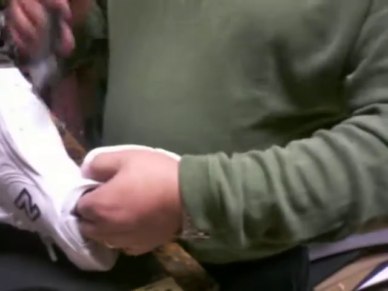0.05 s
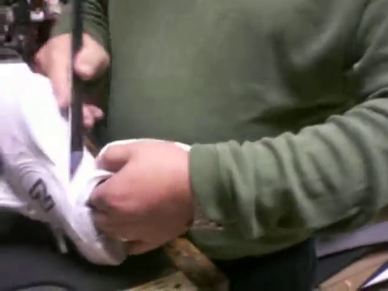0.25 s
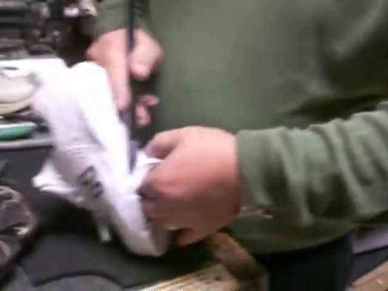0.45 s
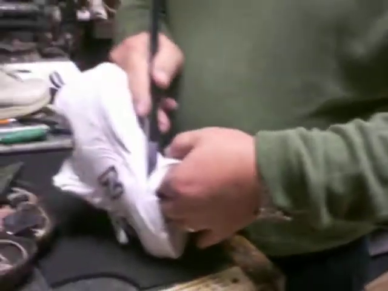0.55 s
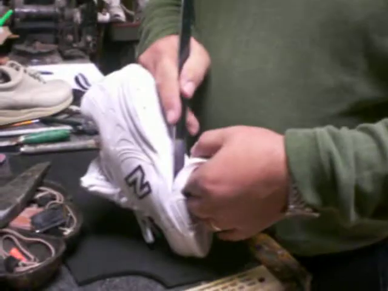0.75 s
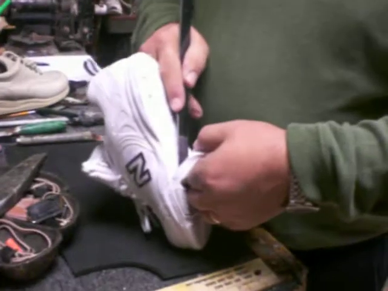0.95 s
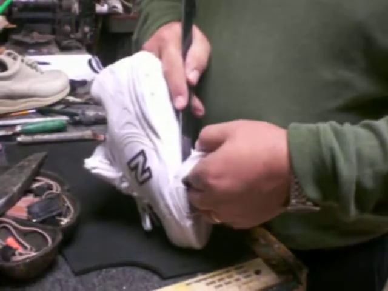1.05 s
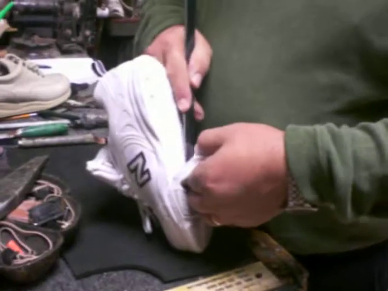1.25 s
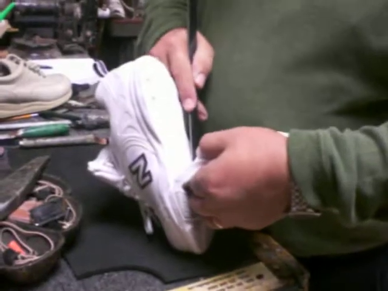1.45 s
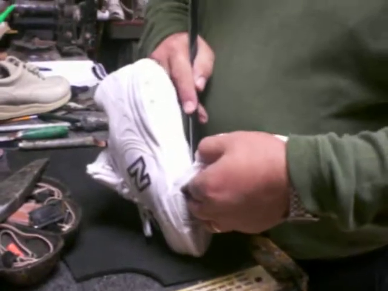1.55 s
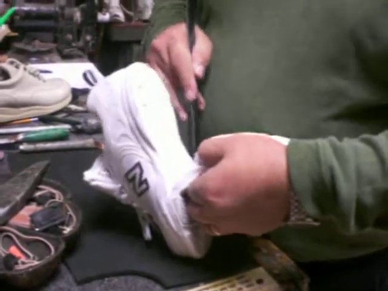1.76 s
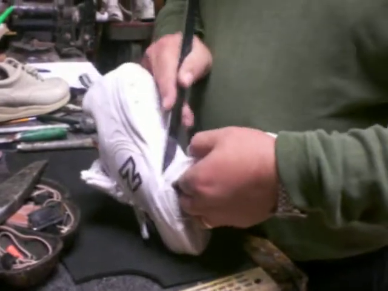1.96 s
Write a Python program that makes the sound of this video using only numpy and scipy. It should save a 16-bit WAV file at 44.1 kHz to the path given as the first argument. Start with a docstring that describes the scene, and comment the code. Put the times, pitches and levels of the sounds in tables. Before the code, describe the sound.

Soft blade scraping on a rubber sole, with a few small knocks over workshop hum.

```python
"""A thin blade works on the sole of a hand-held shoe, over a small workshop's steady noise and hum.
First the blade tip ticks and scrapes, and one hollow knock makes the shoe ring, with a faint rumble.
Then short, light strokes rasp as the blade catches on the rubber; the shoe takes a few soft bumps
and rustles in the hand. Near the end the blade bites in with a hiss, its tip ticks once more,
and its flat side taps the edge of the sole."""
import sys
import numpy as np
from scipy import signal
from scipy.fft import rfft, irfft
from scipy.io import wavfile

SR = 44100
rng = np.random.default_rng(int(sys.argv[2]) if len(sys.argv) > 2 else 0)


def wav_record(signal):
    """Record a signal, one row per channel, as 16-bit PCM in the file named by sys.argv[1]."""
    frames = np.transpose(np.atleast_2d(signal))
    bounded = np.clip(frames, -1, 1)
    # unit amplitude maps onto the largest positive 16-bit level
    quanta = np.round(bounded * 32767).astype(np.int16)
    wavfile.write(sys.argv[1], SR, quanta)


N = 88200
TIME = np.arange(N) / SR

# the tones the shoe rings with: (pitch [Hz], level [dB], time to fade by 60 dB [s])
SHOE_TONES = [(225, -15, 0.027), (376, -38, .05), (537, -15, 0.057), (561, -4, 0.042), (739, -14.5, 0.043),
              (996, -1, 0.0061), (1540, -13.5, 0.013), (2060, -16.5, 0.009), (2360, -17, 0.013),
              (3067, -9.5, .005), (4510, -11, 0.0025), (5130, -29, 0.015), (6700, -22.5, 0.0062),
              (8530, -13, 0.0024)]


def from_db(db):
    """Turn decibels into a factor to multiply a sound by."""
    return 10 ** (np.asarray(db) / 20)


def rms_one(x):
    """Scale a sound so that its average strength (rms) is 1."""
    return x / np.sqrt(np.mean(x ** 2) + 1e-20)


def at_hz(points, hz, column=1):
    """Read a table between its rows, with frequency spaced in octaves."""
    table = np.array(points)
    return np.interp(np.log(hz), np.log(table[:, 0]), table[:, column])


def coloured(x, spectrum, tilt_db=0):
    """Set a sound's balance of bass and treble, tilted by tilt_db per octave; strength 1."""
    hz = np.maximum(np.fft.rfftfreq(N, 1 / SR), 1)
    octaves = np.log2(np.maximum(hz, spectrum[0][0]))
    gain = from_db(at_hz(spectrum, hz) + tilt_db * octaves)
    return rms_one(irfft(rfft(x) * gain, N))


def soften(x, hz, order=1, kind="low"):
    """Keep what is below hz ("low") or above it ("high"); a higher order cuts more steeply."""
    sections = signal.butter(order, min(hz, SR / 2 - 1), kind, fs=SR, output="sos")
    return signal.sosfilt(sections, x + 1e-18)


def drift(hz):
    """A random wander of strength 1; a higher hz makes it quicker."""
    return rms_one(soften(rng.standard_normal(2 * N), hz, order=2)[N:])


def swell(peak_s, rise_s, fall_s, db):
    """A level that builds and falls away: 8.5 dB down one rise or fall time from its peak."""
    away = np.maximum((peak_s - TIME) / rise_s, (TIME - peak_s) / fall_s)
    return from_db(db - 8.5 * away ** 1.72)


def ring(force, tones):
    """A pushed object rings with its own tones, each fading at its own speed."""
    sound = np.zeros(N)
    for hz, db, fade_s in tones:
        decay = from_db(-60 / (fade_s * SR))
        angle = 2 * np.pi * hz / SR
        feedback = [1, -2 * decay * np.cos(angle), decay * decay]
        sound += from_db(db) * signal.lfilter([0, np.sin(angle)], feedback, force + 1e-18)
    return sound


def blows(hits, tones):
    """Each hit, a click and a crunch of grit with its own level and brightness, makes an object ring."""
    crunch_share, crunch_s = 0.062, 0.0018
    force = np.zeros(N)
    for start_s, db, brightness_hz in hits:
        click = signal.unit_impulse(N, int(start_s * SR))
        fading = signal.lfilter([1], [1, -np.exp(-1 / (crunch_s * SR))], click + 1e-18)
        crunch = soften(crunch_share * fading * rng.standard_normal(N), hz=1000, order=2, kind="high")
        force += from_db(db) * soften(click + crunch, brightness_hz)
    # a thing as small as a shoe gives off little bass
    return soften(ring(force, tones), hz=248.4, order=4, kind="high")


def grains():
    """Rubbing is countless tiny catches of uneven size, bunched by a quick judder."""
    catches_per_s, judder_db, judder_hz = 14000, 2, 116
    sizes = from_db(-0.5 * np.minimum(rng.exponential(1, N), 4))
    signs = rng.choice([-1, 1], N)
    caught = rng.random(N) < catches_per_s / SR
    return sizes * signs * caught * from_db(judder_db * drift(judder_hz))


def background():
    """Steady room noise and a faint, wavering hum."""
    # the hum's tones: (pitch [Hz], level [dB], waver [dB])
    hum_tones = [(60, -73.5, 4), (162.6, -69, 3.5)]
    # the colour of the room noise: (frequency [Hz], level [dB])
    air_colour = [(15, -39), (25, -3), (151, 0.5), (205, -4), (279, -1.5), (317, -6), (572, -5), (702, -10),
                  (1860, -14), (6210, -20), (7440, -20), (8030, -19.5), (9610, -21.5), (10400, -21.5),
                  (11500, -29.5), (15000, -49), (22000, -120)]
    hum = 0
    for hz, db, waver_db in hum_tones:
        waver = from_db(waver_db * np.tanh(drift(hz=1.9)))
        tone = np.sin(2 * np.pi * (hz * TIME + rng.random()))
        hum += from_db(db) * rms_one(waver * tone)
    return hum + from_db(-56.5) * coloured(rng.standard_normal(N), air_colour)


def rumble():
    """A low rumble swells faintly around the loud knock and just after it."""
    # the swells: (peak time [s], rise [s], fall [s], level [dB])
    swells = [(0.29, 0.11, 0.086, -61), (0.49, 0.046, .05, -60)]
    # the rumble's colour: (frequency [Hz], level [dB])
    colour = [(35, -28), (52, -10), (62, 8), (75, -3), (110, -14), (250, -66)]
    return sum(swell(*row) for row in swells) * coloured(rng.standard_normal(N), colour)


def room_echo(sound):
    """The workshop sends back a short wash of sound that dies away, with a few dull echoes in it."""
    # bounces off the bench and walls: (delay [s], level [dB])
    bounces = [(.0098, -18.5), (.0158, -21.5), (0.0267, -26.5), (.0305, -17)]
    # the wash: (frequency [Hz], level [dB], time to fade by 60 dB [s])
    wash = [(151, -24, 0.27), (279, -11, 0.31), (500, -13, 0.21), (1210, -9.5, 0.24), (3130, -9.5, 0.23),
            (6304, -8, 0.48), (11120, -9.5, 0.051)]
    t, tail = TIME[:SR // 2], 0
    onset = 1 - np.exp(-(t / 0.0027) ** 2)
    edges_hz = np.geomspace(100, 12800, 8)
    for low, high in zip(edges_hz, edges_hz[1:]):
        hz = np.sqrt(low * high)
        band_filter = signal.butter(2, [low, high], "band", fs=SR, output="sos")
        noise = signal.sosfilt(band_filter, rng.standard_normal(len(t)))
        fade = from_db(-60 * t / at_hz(wash, hz, column=2))
        band_share = np.sqrt(2 * (high - low) / SR / len(t))
        tail += rms_one(noise * fade * onset) * from_db(at_hz(wash, hz)) * band_share
    echoes = sum(from_db(db) * np.interp(TIME - delay, TIME, sound, left=0) for delay, db in bounces)
    return soften(echoes, hz=4230) + signal.fftconvolve(sound, tail)[:N]


def handling():
    """Fingers and fabric rub on the shoe with a dull rustle as the grip shifts."""
    # the rubs: (peak time [s], rise [s], fall [s], level [dB])
    rubs = [(0.66, .02, .03, -59), (1.04, 0.035, 0.057, -61), (1.135, 0.025, 0.038, -58.5),
            (1.32, 0.07, 0.061, -63), (1.745, 0.015, 0.017, -51.5), (1.87, 0.062, 0.023, -59)]
    # the rustle's colour: (frequency [Hz], level [dB])
    colour = [(120, -1), (220, 2.5), (380, -9), (550, 1.5), (750, -0.5), (1050, -3.5), (1600, -14),
              (3000, -24.5)]
    return sum(swell(*row) for row in rubs) * coloured(grains(), colour)


def tip_ticks():
    """The tip of the blade touches the sole and rings briefly."""
    # the touches: (time [s], level [dB], brightness [Hz])
    touches = [(0.028, -46, 3000), (0.1135, -42.5, 3500), (0.206, -42, 14000), (1.8236, -36.5, 9000)]
    # the tip's tones: (pitch [Hz], level [dB], time to fade by 60 dB [s])
    tip_tones = [(810, -1.5, .012), (1290, -4, 0.0054), (2700, -7, 0.0057), (4100, -6, 0.0035),
                 (5500, -5, .003)]
    return blows(touches, tip_tones)


def edge_tap():
    """The flat of the blade taps the edge of the sole, which rings."""
    # the tap: (time [s], level [dB], brightness [Hz])
    tap = [(1.957, -27.5, 990)]
    # the edge's tones: (pitch [Hz], level [dB], time to fade by 60 dB [s])
    edge_tones = [(502, -12.5, 0.034), (774, -9, 0.014), (1170, -9.5, 0.0077), (1790, -1.5, 0.02),
                  (2310, -6, 0.011)]
    return blows(tap, edge_tones)


def shoe_knocks():
    """One hard knock and a few soft bumps make the shoe ring hollowly."""
    # the hits on the shoe: (time [s], level [dB], brightness [Hz])
    hits = [(0.199, -48, 1490), (0.246, -13, 10800), (0.650, -43.5, 1490), (0.900, -38, 600),
            (0.944, -44, 1500), (0.9495, -42, 3500), (0.9545, -35, 7000), (0.9805, -32.5, 6000),
            (0.9867, -29, 920)]
    return blows(hits, SHOE_TONES)


def scraping():
    """The blade rasps over the rubber and shakes the shoe; where it bites in, it hisses."""
    # the strokes: (peak time [s], rise [s], fall [s], level [dB], treble tilt [dB per octave])
    strokes = [(0.214, 0.02, 0.12, -53.5, -3.5), (0.61, 0.064, 0.037, -56.5, -2),
               (0.743, .025, 0.049, -57, -1.5), (0.81, 0.037, 0.046, -56, -1),
               (0.919, .04, 0.049, -52.5, -1), (0.994, 0.024, 0.032, -50.5, 1),
               (1.135, 0.097, 0.024, -55, 4), (1.22, 0.093, 0.045, -60.5, 4),
               (1.33, 0.073, 0.053, -58.5, 0), (1.42, 0.03, 0.019, -49, 0.6),
               (1.632, 0.081, 0.06, -53, -.5), (1.707, 0.043, .045, -47, -0.5),
               (1.868, 0.08, 0.12, -58, 2.5), (1.966, 0.018, 0.029, -51.5, -2.5)]
    # the rasp's colour: (frequency [Hz], level [dB])
    colour = [(300, -3), (550, -3.5), (1050, -4), (1700, -4), (2800, -2.5), (4200, -4.5), (5600, -4),
              (7000, -1.5), (8800, 0), (10500, -4.5), (12000, -16)]
    # the bites into the rubber: (peak time [s], rise [s], fall [s], level [dB])
    bites = [(1.716, 0.017, 0.0065, -40), (1.7255, 0.0062, 0.0018, -43.5)]
    # the thin blade's tones: (pitch [Hz], level [dB], time to fade by 60 dB [s])
    blade_tones = [(5250, -2, 0.0053), (6140, 1, 0.004), (7140, -3, 0.0037), (7940, 0, 0.0035),
                   (9000, 0, 0.0026), (9500, 1.5, 0.0027)]
    rasp = sum(swell(*stroke) * coloured(grains(), colour, tilt_db) for *stroke, tilt_db in strokes)
    shoe_body = rms_one(ring(rasp, SHOE_TONES)) * np.std(rasp) * from_db(-19.5)
    scrape = soften(rasp + shoe_body, hz=334, order=2, kind="high")
    blade_ring = sum(ring(grains(), [tone]) for tone in blade_tones)
    hiss = rms_one(soften(blade_ring, hz=3900, order=2, kind="high"))
    return scrape + hiss * sum(swell(*bite) for bite in bites)


def scene():
    """The work on the shoe, its echo and the background, in one channel."""
    work = shoe_knocks() + tip_ticks() + edge_tap() + scraping() + handling()
    return (work + room_echo(work) + background() + rumble())[None]


def record(dry):
    """A small microphone has two dips in the treble and loses the very highest sounds."""
    # the narrow dips: (frequency [Hz], width [Hz])
    dips = [(6680, 290), (7430, 260)]
    for hz, width_hz in dips:
        dry = signal.lfilter(*signal.iirnotch(hz, hz / width_hz, fs=SR), dry)
    dry = soften(dry, hz=11120, order=8)
    steep_cut = signal.ellip(10, .2, 80, 12460, fs=SR, output="sos")  # above 12460 Hz
    return signal.sosfilt(steep_cut, dry)


dry = scene()
out = record(dry)
wav_record(out)
```